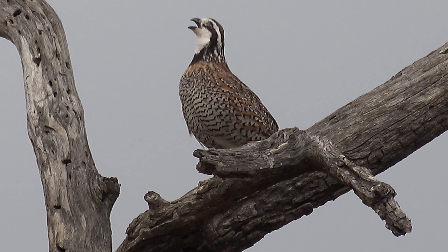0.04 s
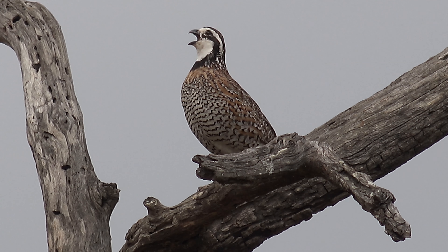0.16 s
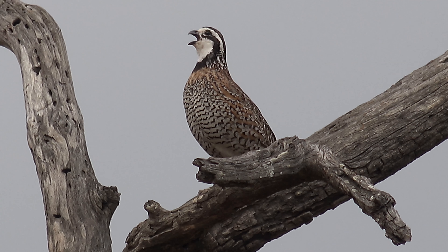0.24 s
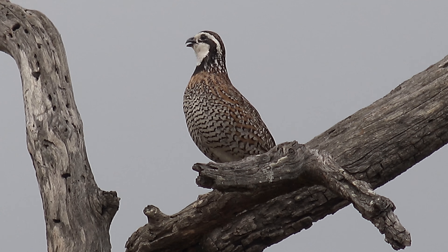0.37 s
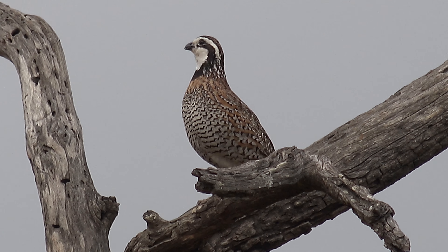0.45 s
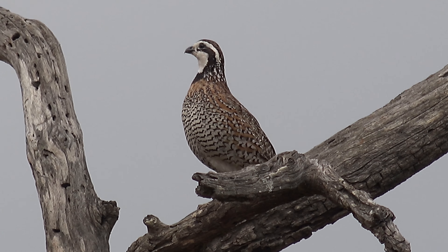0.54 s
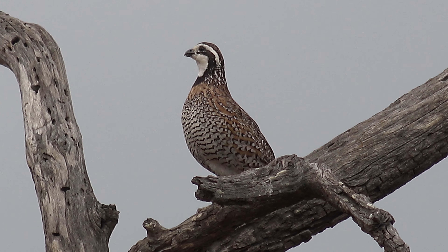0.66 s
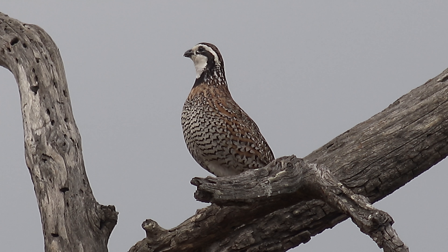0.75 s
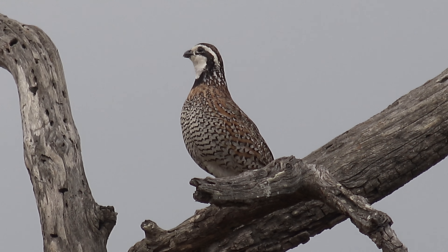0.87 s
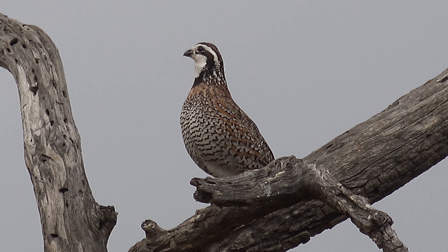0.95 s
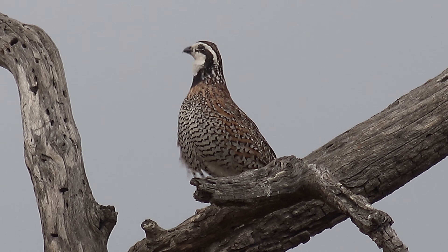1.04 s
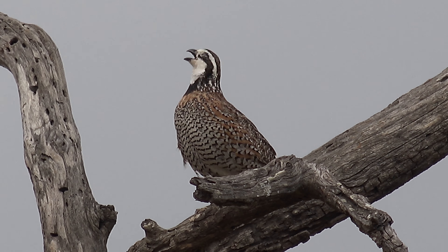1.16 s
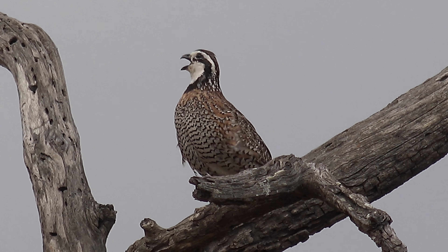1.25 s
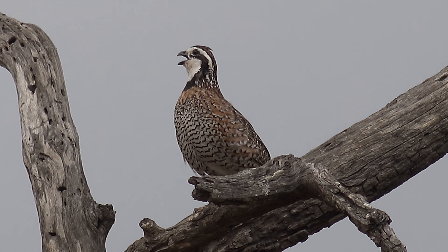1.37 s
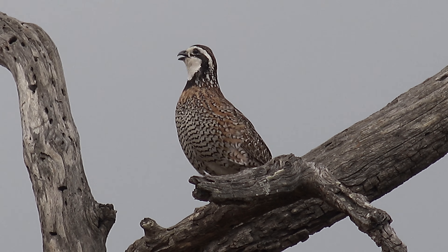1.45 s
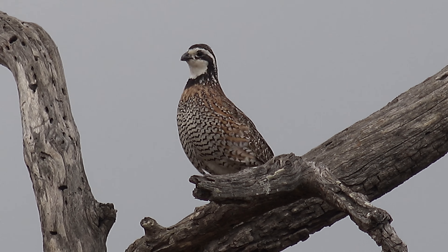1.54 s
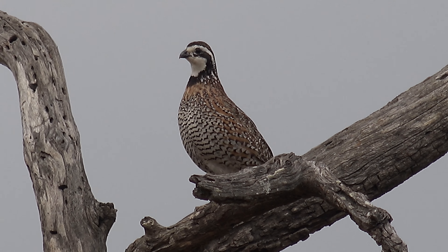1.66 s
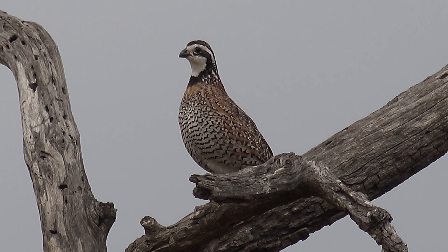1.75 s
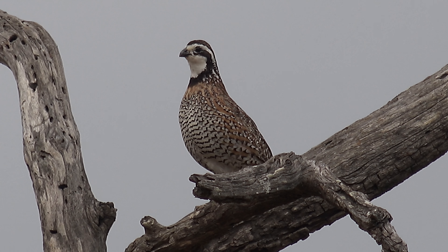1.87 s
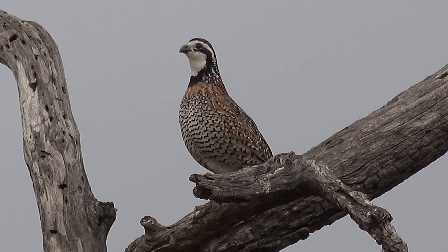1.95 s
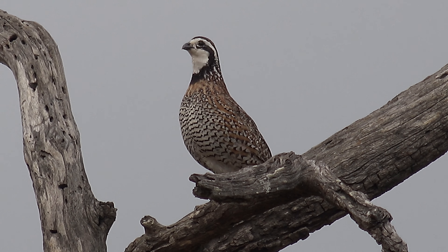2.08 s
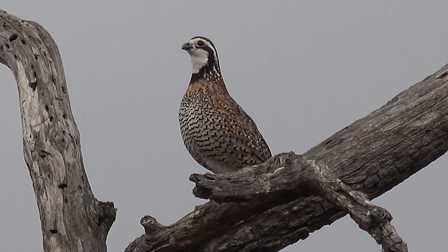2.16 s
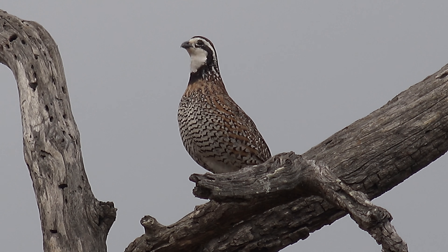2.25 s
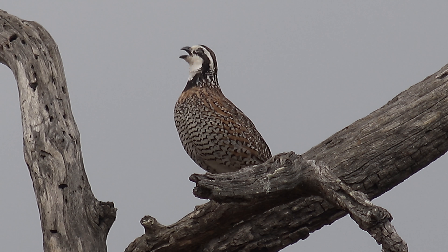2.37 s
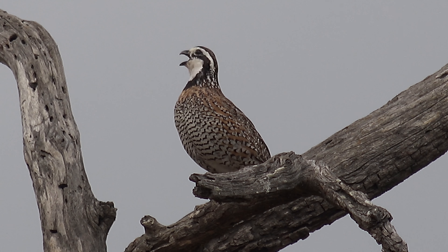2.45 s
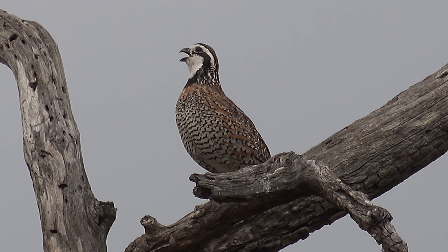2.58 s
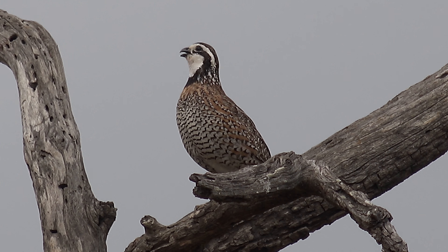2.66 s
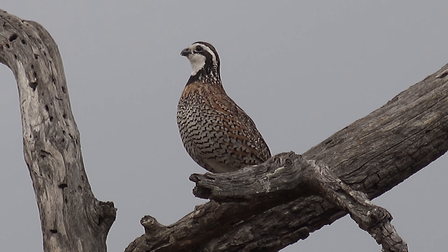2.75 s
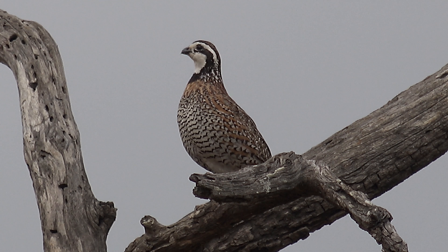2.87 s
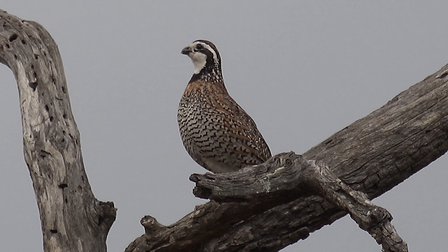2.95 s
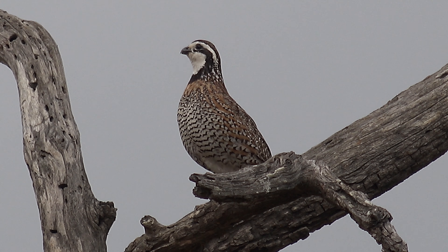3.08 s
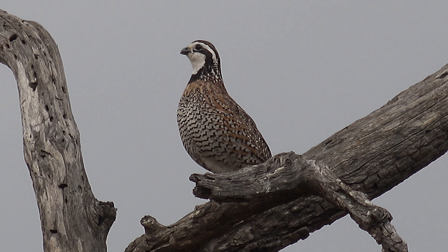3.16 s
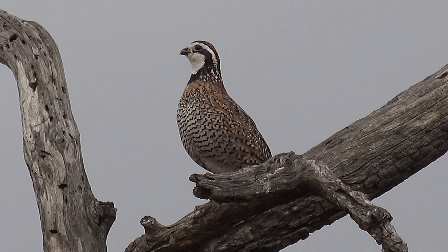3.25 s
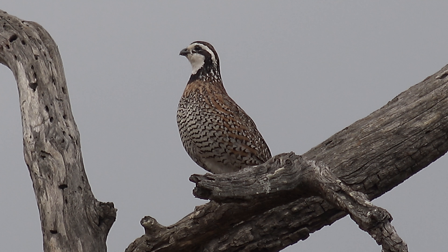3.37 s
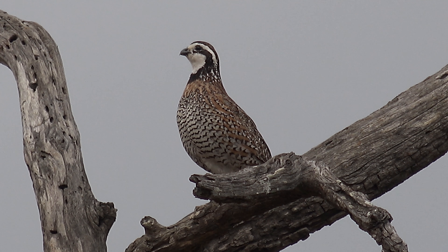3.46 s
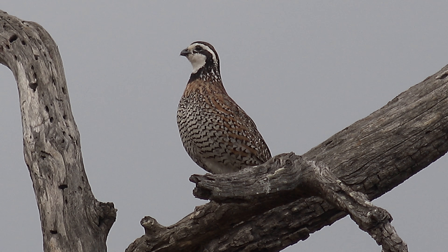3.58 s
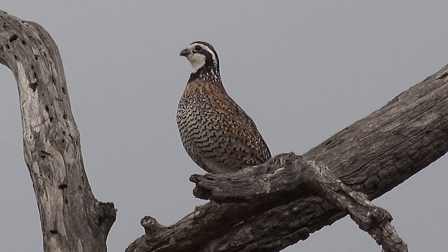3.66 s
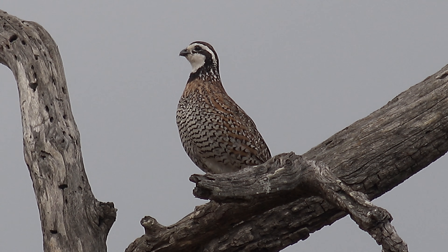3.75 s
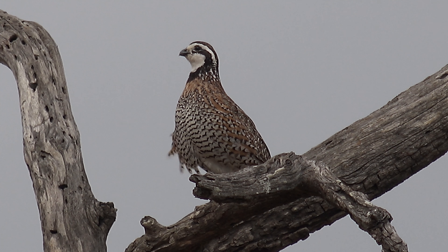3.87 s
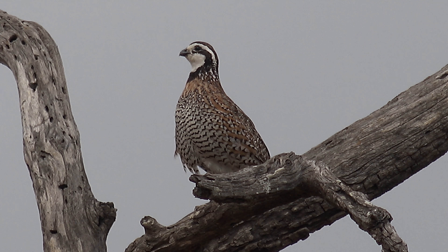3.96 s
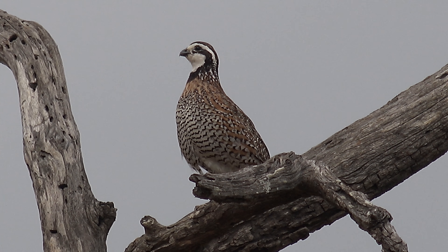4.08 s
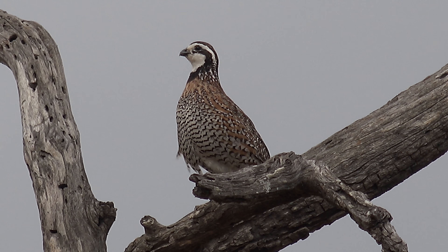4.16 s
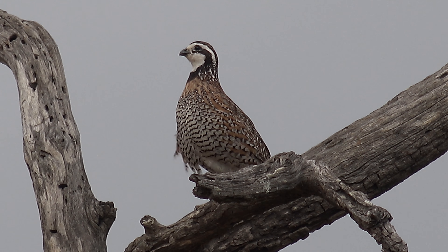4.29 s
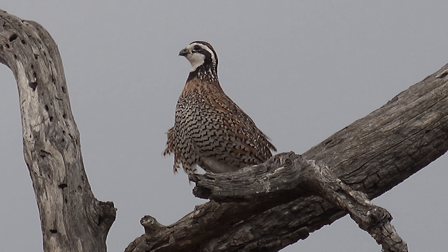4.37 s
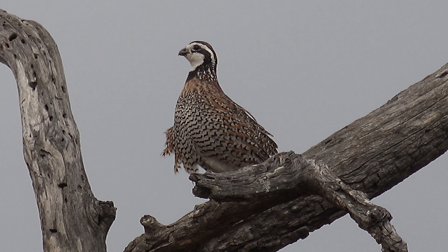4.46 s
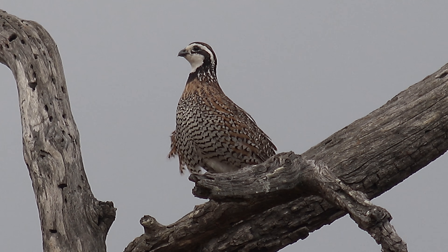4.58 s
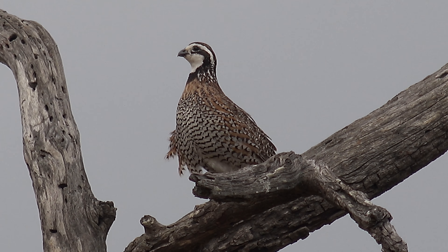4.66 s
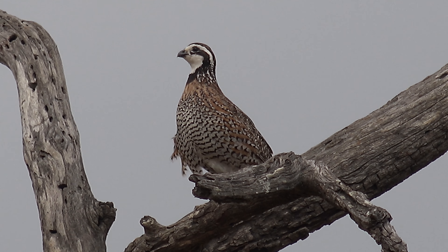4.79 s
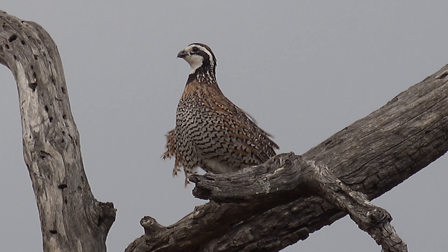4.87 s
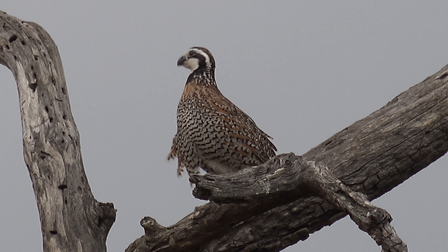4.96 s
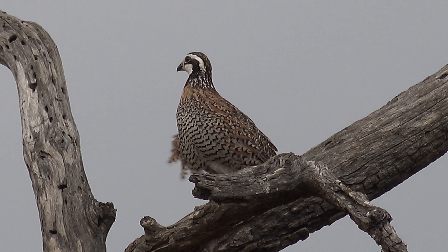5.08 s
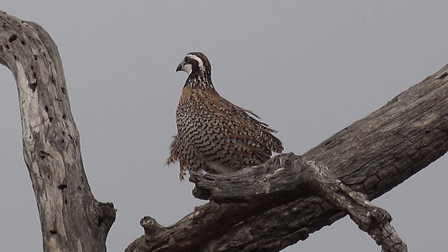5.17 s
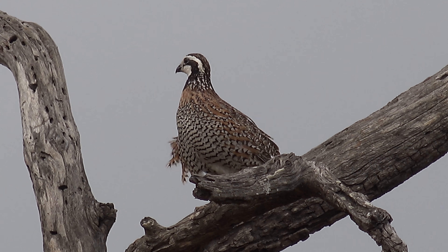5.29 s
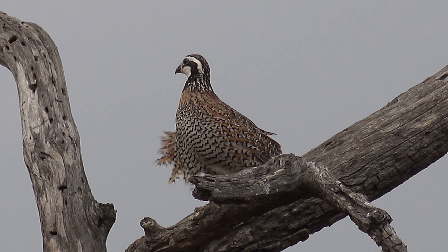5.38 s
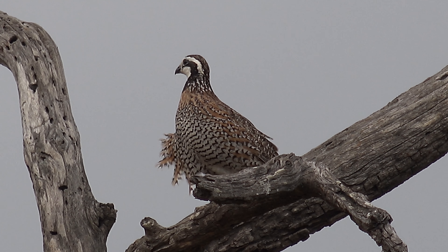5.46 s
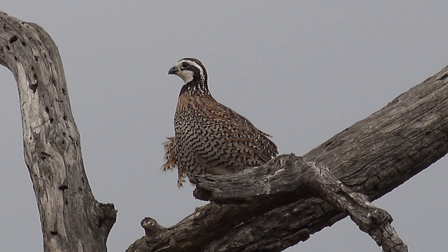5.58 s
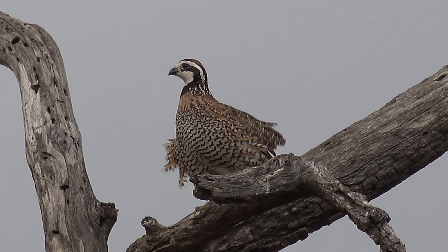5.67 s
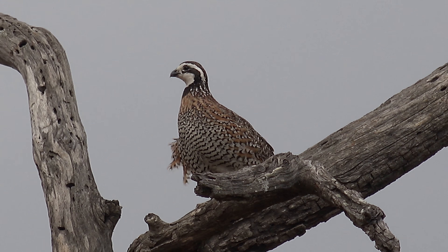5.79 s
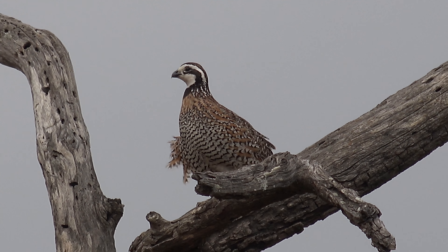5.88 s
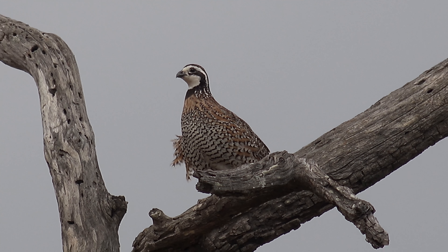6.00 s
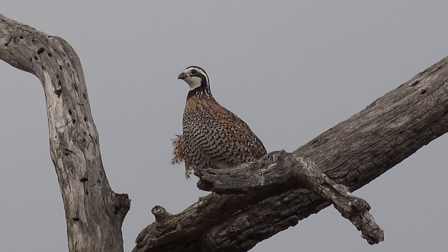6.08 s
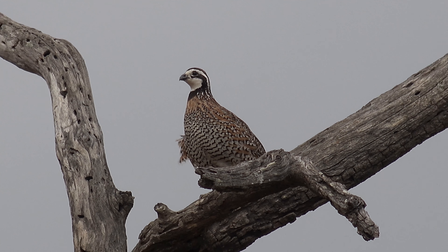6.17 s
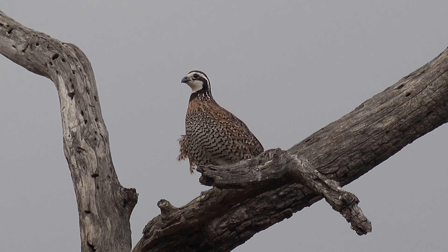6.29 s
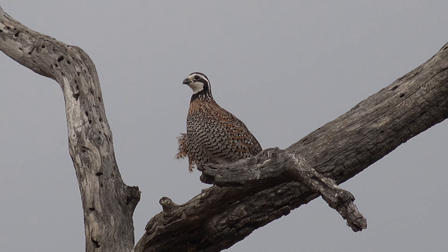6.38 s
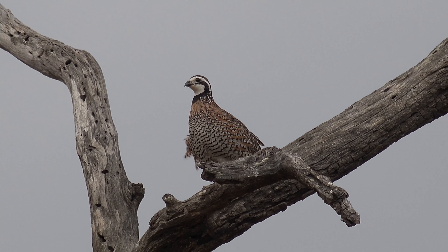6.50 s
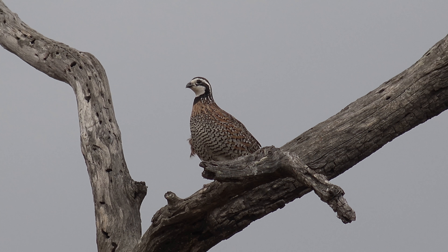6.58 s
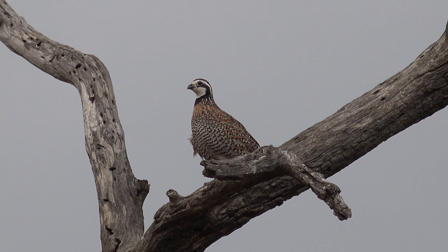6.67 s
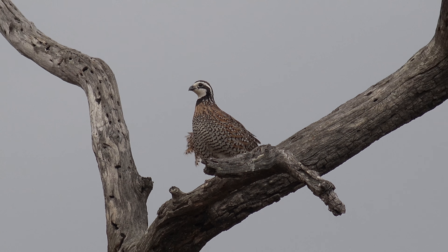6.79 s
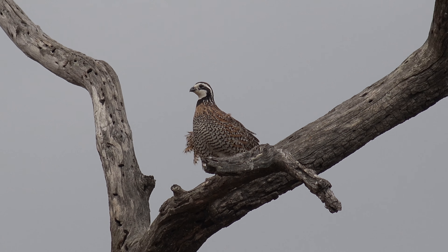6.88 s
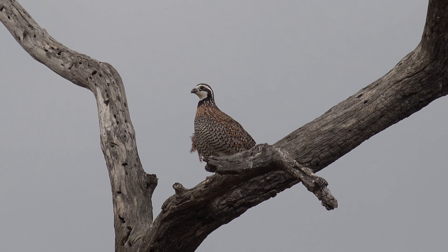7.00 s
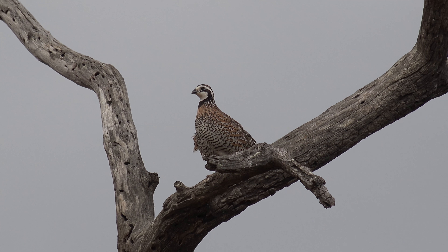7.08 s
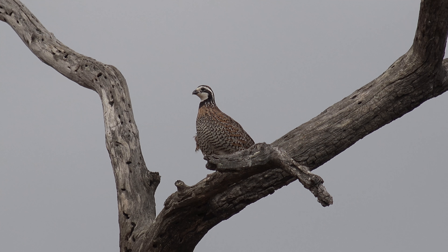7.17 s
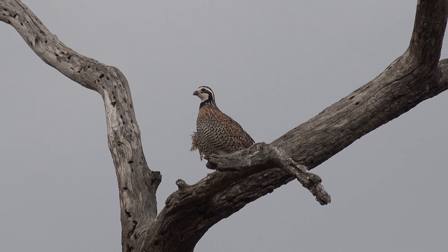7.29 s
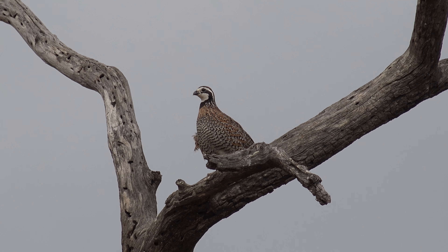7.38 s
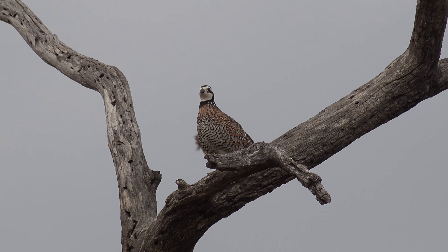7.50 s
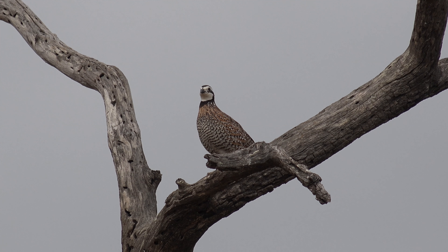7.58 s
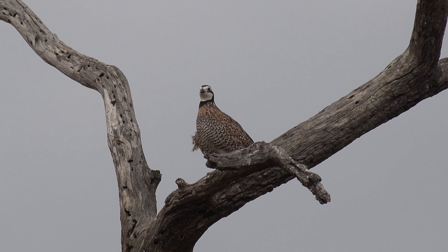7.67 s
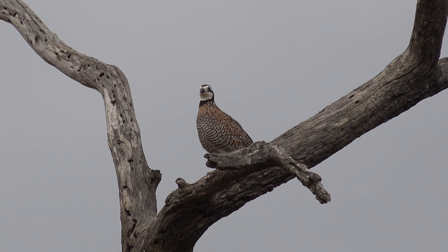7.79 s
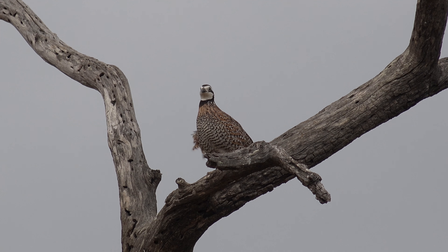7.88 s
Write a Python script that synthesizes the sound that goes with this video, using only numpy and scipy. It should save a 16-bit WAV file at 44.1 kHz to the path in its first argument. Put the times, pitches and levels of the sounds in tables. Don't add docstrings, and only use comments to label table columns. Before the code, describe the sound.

In a quiet open place, a quail close ahead calls almost at once, at about 0.1 seconds: a short quiet lead-in, a strong clear whistle bending upward, then a quick hoarse falling end. Hard camera shutter clicks clatter beside the microphone at 0.2 to 0.3 seconds, overlapping it. The call repeats near 1.2 and 2.4 seconds, with slight scattered echo. Softer, duller shutter bursts come around 0.7, 2.5, 3.0 and 4.2 seconds, with small taps near 2.2 and 4.6. A faint insect rasp swells around 2.6. From about 3 seconds the quail is silent and distant songbirds stand out with thin piping, chips, sliding whistles and burry notes. Another bright shutter cluster snaps at 5.0 to 5.3 seconds, followed by weaker clacks near 5.9 and 7.2 and a tap at 7.7. Soft hiss and faint low gusts continue throughout.

```python
import sys
import numpy as np
from scipy import signal
from scipy.fft import rfft, irfft, next_fast_len
from scipy.io import wavfile

SR = 44100
rng = np.random.default_rng(int(sys.argv[2]) if len(sys.argv) > 2 else 0)


def voltage_ratio(level):
    return 10 ** (np.asarray(level, float) / 20)


def file_out(sig):
    cols = np.atleast_2d(sig).T
    lim = np.clip(cols, -1, 1)
    pcm = np.round(lim * 32767).astype(np.int16)
    wavfile.write(sys.argv[1], SR, pcm)


N = 350154

# time_s, pitch_hz, level_db
WHISTLE = [
    (-.05, 830, -46),
    (-.034, 1285, -56.5),
    (-.013, 1380, -50),
    (-.004, 1756, -32.5),
    (.003, 1888, -28.5),
    (0.072, 1917, -27),
    (0.122, 2029, -24),
    (0.1461, 2160, -19),
    (0.154, 2263, -25.5),
]
BREAK_S, FALL_S = .153, .097


def rms_one(x):
    return x / np.sqrt(np.mean(x ** 2) + 1e-20)


def at_hz(points, hz):
    table_hz, db = np.array(points).T[:2]
    return np.interp(np.log(np.maximum(hz, 1)), np.log(table_hz), db)


def filtered(x, order, edges_hz, kind="low"):
    return signal.sosfilt(signal.butter(order, edges_hz, kind, fs=SR, output="sos"), x)


def coloured(x, points):
    size = 2048
    log_gain = np.log(voltage_ratio(at_hz(points, np.arange(size // 2 + 1) * SR / size)))
    fold = np.r_[1, 2 * np.ones(size // 2 - 1), 1, np.zeros(size // 2 - 1)]
    cepstrum = irfft(log_gain) * fold
    impulse = irfft(np.exp(rfft(cepstrum)))
    return signal.oaconvolve(x, impulse[None], axes=1)[:, :N]


def drift(rate_hz, size):
    r = np.exp(-2 * np.pi * rate_hz / SR)
    slow = signal.lfilter([1], [1, -2 * r, r * r], rng.standard_normal(size + 4000))
    return rms_one(slow[2000:])[2000:]


def panned(x, pan_db):
    return x * voltage_ratio(np.array([[.5], [-.5]]) * pan_db)


def scrub(x, t60_s, wet_db, gap_s):
    t = np.arange(int(t60_s * SR)) / SR
    tail = rng.standard_normal((2, len(t))) * voltage_ratio(-60 * t / t60_s) * np.clip(t / gap_s, 0, 1)
    tail = voltage_ratio(wet_db) * tail / np.sqrt(np.sum(tail ** 2, axis=1, keepdims=True))
    return x + signal.oaconvolve(x, tail, axes=1)[:, :N]


def call_contour(t, whistle_db, fall_db, dip_depth, sharp_hz):
    # time_s, depth_db, width_s
    dips = [
        (.008, -3, 0.0016),
        (0.087, -1.5, 0.0067),
        (.14, -1.5, .003),
    ]
    fall_hz, creep_per_s, sag_from_s, sag_per_s = 1643, 2.2, .03, 5.6
    slip_s, slip_width_s, slip_share, slip_db = .0135, .00086, .205, 3
    second_s, second_width_s, second_share = .037, .0034, .05
    swell_s, swell_db, dying_db_per_s, last_s = .023, 24, 153, .0053
    shut_s, shut_db = .004, 24.5
    s, hz, db = np.transpose(WHISTLE)
    held_hz = np.interp(t, s, hz) + sharp_hz * (t > 0)
    dip_db = sum(depth * np.exp(-((t - at) / width) ** 2) for at, depth, width in dips)
    held_db = np.interp(t, s, db) + whistle_db * (t > -.005) + dip_depth * dip_db

    u = t - BREAK_S
    slip = slip_share * (1 + np.tanh((u - slip_s) / slip_width_s)) / 2
    slip += second_share * (1 + np.tanh((u - second_s) / second_width_s)) / 2
    sagging_hz = fall_hz * np.exp(-creep_per_s * u - slip - sag_per_s * np.maximum(u - sag_from_s, 0))
    dying_db = fall_db - swell_db * np.clip(1 - u / swell_s, 0, 1) ** 2
    dying_db -= dying_db_per_s * np.maximum(u - swell_s, 0)
    dying_db += slip_db * np.exp(-((u - slip_s) / slip_width_s) ** 2)
    dying_db -= 8 * np.clip(1 - (FALL_S - u) / last_s, 0, 1)

    closed = np.clip(1 - abs(u) / shut_s, 0, 1) + np.clip(1 - (t - s[0]) / shut_s / 2, 0, 1)
    return np.where(u > 0, sagging_hz, held_hz), np.where(u > 0, dying_db, held_db) - shut_db * closed


def quail():
    # start_s, whistle_db, fall_peak_db, dip_depth, sharp_hz
    calls = [
        (0.0792, -0.8, -29, 2.4, -7.5),
        (1.170, -1.8, -28, 0.85, 6),
        (2.375, -2.5, -28.5, 1.3, 12.5),
    ]
    membrane = [
        (29.5, 0.0099, -8, -6.5, 26.5),
        (7, 0.0062, -19.5, -3.5, -9),
        (0, 0.0048, 5.5, 0.5, 5.5),
    ]
    # frequency_hz, gain_db
    throat = [(600, -13.5), (1300, -18.5), (1850, -5), (2400, 9), (3200, -1.5), (3550, -25.5), (4300, -16),
              (5000, -21), (5800, -31), (7700, -27.5), (9600, -25), (11000, -86)]
    # delay_s, level_db
    echoes = [
        (.011, -17),
        (.023, -20),
    ]
    half_db, jitter, hoarse_db, breath_db = -24, .006, 3, -21
    out = np.zeros(N)
    t = np.arange(WHISTLE[0][0], BREAK_S + FALL_S, 1 / SR)
    falling = t > BREAK_S
    shut, whistle, slack = np.pad(membrane, ((0, 0), (0, 8)))
    opening = np.clip(1 + t / .012, 0, 1)
    source_db = [np.where(falling, slack[n], shut[n] + opening * (whistle[n] - shut[n])) for n in range(12)]
    for start_s, *effort in calls:
        pitch_hz, level_db = call_contour(t, *effort)
        hz = pitch_hz * (1 + jitter * (falling + 6 * (t < -.005)) * drift(280, len(t)))
        phase = 2 * np.pi * np.cumsum(hz) / SR
        gains = [voltage_ratio(at_hz(throat, n * hz) + db) for n, db in enumerate(source_db, 1)]
        voice = sum(g * np.sin(n * phase) for n, g in enumerate(gains, 1))
        voice = voice / np.sqrt(sum(g ** 2 for g in gains) / 2)
        halves = np.sin(1.5 * phase) * np.exp(-t / .03) + .12 * np.sin(4.5 * phase)
        voice += voltage_ratio(half_db) * halves * (t > 0) * np.exp(-t / .09) * ~falling
        breath = coloured(rng.standard_normal((1, len(t))), throat)[0, :len(t)]
        voice += voltage_ratio(breath_db) * falling * rms_one(breath)
        voice *= voltage_ratio(level_db + hoarse_db * falling * np.tanh(drift(220, len(t))))
        at = round((start_s + t[0]) * SR)
        out[at:at + len(t)] += voice * np.clip((t[-1] - t) / .0043, 0, 1)
    return out + sum(voltage_ratio(db) * np.roll(out, round(delay_s * SR)) for delay_s, db in echoes)


def strikes(low_hz, high_hz):
    # start_s, peak_db
    hard = [(.2052, -19), (.2085, -20), (.2548, -20), (.268, -21), (.2935, -23), (5.0454, -22),
            (5.2475, -25), (5.2506, -22), (5.2531, -21), (5.2885, -23), (5.29, -24)]
    s, db = np.transpose(hard)
    hits = np.full(N, 1e-18)
    hits[(s * SR).astype(int)] = 2.8 * voltage_ratio(db)
    return filtered(hits, 2, [low_hz, high_hz], "band")


def rattle(contacts, body, modes_db, alike):
    # frequency_hz, width_hz, level_db
    modes = [(391.3, 30.5, 3), (907, 49, -7), (1310, 34.6, -10.5), (2160, 16, -1), (2530, 21, 0.5),
             (3700, 95, -1.5), (4170, 230, -8.5), (5020, 39.8, -38.5), (7080, 48, -18.5)]
    shake, cracks = np.zeros((2, 2, N))
    for s, db, t60_s, rise_s, pan_db, crack_db in contacts:
        at = round(s * SR)
        t = np.arange(max(min(int(t60_s * SR), N - at), 0)) / SR
        cracks[:, at:at + len(t)] += panned(voltage_ratio(db + crack_db - 60 * t / .02), pan_db)
        dying = voltage_ratio(-60 * t / t60_s) + voltage_ratio(crack_db - 60 * t / .0013)
        shake[:, at:at + len(t)] += panned(voltage_ratio(db) * dying * np.clip(t / rise_s, 0, 1), pan_db)
    mid, side = rng.standard_normal((2, N)) * voltage_ratio(2.5 * drift(404, N))
    clicks = np.sqrt(alike) * mid + np.sqrt(1 - alike) * side * [[1], [-1]]
    scale = np.sqrt(np.mean(coloured(clicks[:, :SR], body) ** 2))
    broad = coloured(clicks * shake, body) * 3 / scale
    rings = 0
    for hz, width_hz, db in modes:
        r = np.exp(-np.pi * width_hz / SR)
        poles = [1, -2 * r * np.cos(2 * np.pi * hz / SR), r * r]
        rings += voltage_ratio(db) * signal.lfilter([1 - r, 0, r - 1], poles, clicks * shake + 1e-18)
    snap = filtered(clicks * cracks, 2, [3000, 9000], "band")
    return broad + voltage_ratio(modes_db) * rings + 1.1 * snap


def ports(x):
    # frequency_hz, left_lead_rad
    port_lead = [(0, 0), (780, 1.1), (3450, 0.3), (5770, 0.5), (7750, 2.3), (10600, 3.6), (11800, 5.7),
                 (16000, 6.4)]
    # frequency_hz, left_minus_right_db
    port_balance = [(60, -3), (330, -0.5), (770, 5.5), (1790, 5.5), (4190, 3), (6410, 2.5), (9810, 3.5),
                    (16000, -8)]
    size = next_fast_len(N)
    hz = np.arange(size // 2 + 1) * SR / size
    turn = np.exp(.5j * np.interp(hz, *np.transpose(port_lead)))
    half = voltage_ratio(at_hz(port_balance, hz) / 2) * turn
    return irfft(rfft(x, size) * np.array([half, 1 / half]), size)[:, :N]


def cameras():
    # start_s, peak_db
    releases = [(0.7058, -37.5), (2.5249, -37.5), (2.9632, -42), (4.1887, -37), (5.204, -41), (5.45, -42),
                (5.93, -36.5), (7.1736, -42), (7.8773, -48.5)]
    # after_release_s, level_db, t60_s, rise_s
    firing = [
        (0, 1.5, 0.092, 0.0015),
        (0.016, -2.5, 0.19, 0.0017),
        (0.094, 4, 0.11, 0.0036),
        (0.107, -6.5, .12, .002),
        (.123, -7, 0.098, .001),
        (.143, -2, 0.068, 0.00064),
        (.151, -1.5, .07, 0.0022),
        (0.178, -7, 0.12, 0.0013),
    ]
    # start_s, peak_db, t60_s, left_minus_right_db, crack_db
    near_contacts = [(0.1992, -18, 0.1, 1, -2), (0.2048, -23.5, 0.1, -2.5, -15),
                     (0.2137, -30, 0.0965, 7.5, 4.5), (0.2512, -19.5, 0.17, -2, 6),
                     (0.2683, -20.5, 0.065, 4, 17), (0.2909, -23.5, 0.07, 1.5, -9),
                     (5.0456, -31.5, 0.1, -2, 26.5), (5.2405, -29, 0.099, 3, -10),
                     (5.246, -19.5, 0.15, -1.5, 0), (5.2586, -25.5, 0.044, 4.5, -4),
                     (5.284, -23, 0.067, -2, -11), (5.2879, -25.5, 0.054, 2, -10),
                     (5.298, -36, 0.041, -4, -5), (5.319, -38, 0.12, 2, -14)]
    # frequency_hz, level_db_per_hz
    far_body = [(180, -49), (300, -18.5), (398, 3), (494, -5.5), (856, -3), (1100, -7.5), (1560, -0.5),
                (3400, -3.5), (4300, -5), (16000, -26)]
    # frequency_hz, level_db_per_hz
    near_body = [(120, -50.5), (200, -31), (347, -9.5), (1100, -8), (1420, -0.5), (1740, -3.5),
                 (2170, -1.5), (2470, -5.5), (4040, 0), (5230, -3.5), (16000, -28)]
    dull, bright = [[(s + lag_s, db + part_db - 19.5, t60_s, rise_s, .1, -9)
                     for s, db in releases for lag_s, part_db, t60_s, rise_s in part]
                    for part in (firing[:2], firing[2:])]
    near = [(s, db - 18, t60_s, .0025, pan_db, crack_db) for s, db, t60_s, pan_db, crack_db in near_contacts]
    mirror = filtered(rattle(dull, far_body, 21, .95), 2, 7000)
    blades = rattle(bright, far_body, 19.9, .84)
    return ports(mirror + blades + rattle(near, near_body, 13, .77) + strikes(3200, 8100))


def taps():
    # start_s, peak_db, knock_hz, left_minus_right_db, tick_db
    tap_rows = [(1.241, -56, 401, 0.5, -28.5), (5.046, -52, 368.3, -1, -30), (2.018, -46, 1380, -3, -32),
                (2.182, -47, 1560, 9.5, 2), (2.19, -58, 3280, 6, 6), (2.215, -44, 1520, 6, -4),
                (2.222, -64, 2980, -2, -8), (4.601, -42, 1350, -3, 11), (5.14, -52, 1880, 0, -24),
                (7.409, -50.5, 860, 5, -21), (7.728, -38, 1410, -3.5, -24)]
    t60_left_s, t60_right_s, tick_t60_s = .14, .055, .0087
    out = np.zeros((2, N))
    t = np.arange(2000) / SR
    for s, db, hz, pan_db, tick_db in tap_rows:
        grit = rng.standard_normal(2000)
        t60_s = t60_left_s if pan_db > 0 else t60_right_s
        tick = rms_one(filtered(grit, 4, [1900, 5800], "band")) * voltage_ratio(tick_db - 60 * t / tick_t60_s)
        knock = rms_one(filtered(grit, 1, [.6 * hz, 1.4 * hz], "band")) * voltage_ratio(-60 * t / t60_s)
        out[:, round(s * SR):][:, :2000] += panned(voltage_ratio(db - 7) * (knock + tick), pan_db)
    return out


def notes(table, edge_s, flutter_db, burr, burr_hz, spread_db):
    out = np.zeros((2, N))
    for (s, length_s, *hz, db), side in zip(table, rng.standard_normal(len(table))):
        t = np.arange(int(length_s * SR)) / SR
        glide_hz = np.exp(np.polyval(np.polyfit([0, length_s / 2, length_s], np.log(hz), 2), t))
        glide_hz *= 1 + .018 * burr * (length_s < .11) * drift(150, len(t))
        beat_hz = burr_hz * (1 + .32 * drift(28.4, len(t)))
        beat = 1 + burr * np.cos(2 * np.pi * np.cumsum(beat_hz) / SR)
        shape = np.clip(np.minimum(t, (length_s - t) / 3) / min(edge_s, length_s / 6), 0, 1)
        level = voltage_ratio(db + 9 + flutter_db * drift(110, len(t)))
        tone = np.sin(2 * np.pi * np.cumsum(glide_hz) / SR) * beat * shape * level
        at = round(s * SR)
        out[:, at:at + len(t)] += panned(tone, 1.5 + spread_db * side)
    return out


def sung(*kinds):
    return [(s, length_s, hz * first, hz, hz * last, db)
            for first, last, rows in kinds for s, length_s, hz, db in rows]


def songbirds():
    # start_s, length_s, middle_hz, level_db
    swoops = [(.36, 0.044, 4500, -80), (.568, .016, 3350, -83), (1.075, 0.033, 4370, -76.5),
              (1.64, 0.061, 4860, -77), (1.862, 0.081, 4900, -75.5), (2.085, 0.035, 4360, -77),
              (2.263, 0.054, 4410, -70.5), (3.63, .03, 4700, -78), (3.825, .03, 4670, -80),
              (6.771, 0.034, 4240, -68)]
    hooks = [(4.472, 0.019, 3700, -53), (4.76, 0.018, 3790, -58.5)]
    slides = [(1.78, 0.12, 3130, -85), (1.9, 0.046, 2273, -71.5), (2.049, 0.075, 2330, -72.5),
              (2.9, 0.093, 2260, -71), (3.378, 0.14, 3160, -67), (7.015, 0.15, 3220, -69)]
    flicks = [(3.563, 0.045, 3470, -61.5), (3.882, 0.036, 3470, -64.5), (4.17, 0.019, 3450, -55.5),
              (5.618, 0.039, 3670, -56), (7.048, 0.025, 4220, -66), (7.125, 0.019, 3920, -65.5)]
    rises = [(6.098, 0.18, 1820, -79), (6.279, 0.005, 4600, -58), (6.52, 0.17, 1850, -81),
             (6.693, 0.0069, 4650, -71), (7.783, 0.011, 4600, -70)]
    lifts = [(2.849, 0.094, 2430, -77), (3.18, 0.063, 3430, -68), (4.269, 0.01, 4400, -61),
             (5.43, .033, 7740, -81), (5.885, .035, 7840, -79), (6.27, 0.054, 7850, -81),
             (6.28, 0.036, 7260, -79), (6.745, 0.012, 4500, -75.5)]
    arches = [(1.775, 0.16, 2554, -77), (6.262, 0.02, 3540, -60), (6.679, .012, 3510, -65),
              (6.995, 0.04, 3660, -69.5)]
    levels = [(.555, 0.014, 3720, -76.5), (.75, 0.06, 5080, -80), (1.03, 0.11, 5020, -74.5),
              (3.596, 0.02, 3750, -62), (3.711, 0.12, 3170, -71.5), (3.906, .02, 3740, -60.5),
              (3.94, 0.14, 3246, -68), (4.66, .04, 2650, -82), (4.752, 0.028, 2530, -61.5),
              (4.776, 0.061, 2650, -60), (4.781, 0.051, 1830, -77), (5.79, 0.058, 2030, -77.5)]
    chips = [(1.695, 0.022, 5870, -62), (1.954, 0.042, 5700, -72), (2.171, 0.018, 5540, -60.5),
             (2.424, 0.025, 5760, -59), (5.466, 0.021, 5910, -63.5), (5.745, 0.024, 5800, -63.5)]
    dives = [(1.59, 0.11, 4660, -73), (3.174, 0.14, 4750, -63.5), (6.838, 0.12, 4620, -63.5)]
    # start_s, length_s, middle_hz, level_db
    churrs = [(1.63, 0.074, 2384, -77.5), (3.328, 0.077, 3050, -75), (5.32, 0.033, 3130, -58.5),
              (5.975, 0.028, 2490, -65), (6.159, 0.046, 2520, -62), (6.359, 0.048, 2550, -63.5),
              (6.582, 0.042, 2550, -64), (6.82, 0.043, 2538, -63.5)]
    tumbles = [(4.547, 0.046, 2860, -62)]
    drops = [(5.118, 0.051, 2116, -68.5), (7.019, 0.033, 2090, -74)]
    sags = [(.485, 0.076, 4640, -82), (3.464, 0.065, 4020, -71), (3.779, 0.023, 4260, -69),
            (3.865, 0.019, 4120, -64), (4.825, 0.05, 2437, -64), (4.875, 0.11, 2320, -69),
            (5.014, 0.034, 3510, -73), (5.533, 0.079, 2580, -63.5), (5.605, 0.13, 2320, -68.5)]
    squeaks = [(4.425, 0.038, 2350, -71.5), (4.44, .05, 3100, -65.5), (4.446, 0.024, 3300, -66),
               (4.717, .04, 2500, -76)]
    drones = [(4.65, 0.098, 3580, -75), (4.775, 0.08, 3520, -73), (4.9, 0.025, 3320, -76),
              (5.665, 0.099, 3640, -65.5), (5.755, 0.049, 3638, -59), (5.81, 0.085, 3720, -69),
              (6.285, 0.26, 3626, -67.5), (7.37, 0.16, 3590, -66.5), (7.5, 0.22, 3635, -61.5),
              (7.72, 0.095, 3590, -73.5), (7.4, 0.21, 7230, -90.5)]
    # start_s, length_s, level_db
    piping = [(1.441, 0.038, -66.5), (1.5, 0.065, -69), (3.235, 0.043, -63), (3.295, 0.06, -68),
              (3.355, 0.015, -70), (4.149, 0.061, -61.5), (4.208, 0.057, -64.5), (5.144, 0.054, -65),
              (5.204, 0.12, -66), (6.494, 0.04, -64), (6.562, 0.042, -61.5)]
    piping_hz, reply_s, reply_db = 3970, .115, -13.5
    piped = [(s, length_s, piping_hz, db) for s, length_s, db in piping]
    pickups = [(s - .006, .01, hz * .95, db - 10) for s, _, hz, db in chips]
    replies = [(s + reply_s, length_s / 2, hz, db + reply_db) for s, length_s, hz, db in churrs]
    song = sung((1.22, .7, swoops), (.96, 1.3, hooks), (1.14, .81, slides), (.79, 1.12, flicks),
                (.88, 1.3, rises), (.92, 1.05, lifts), (.86, .96, arches), (.99, .96, levels + piped))
    chipping = sung((.96, 1.003, chips), (1.55, .87, pickups))
    diving = sung((1.55, .87, dives))
    burry = sung((1.04, .826, churrs), (1.03, .92, replies), (1.18, .824, tumbles), (1.1, .78, drops),
                 (1.03, .92, sags), (.79, 1.12, squeaks))
    droning = sung((.98, 1.005, drones))
    clear = notes(song, .0064, 3.76, 0, 0, 3.2) + notes(chipping, .0023, 3.1, .4, 200, 2.3)
    clear += filtered(notes(diving, .0067, 2.8, 0, 0, 1.5), 2, 4600)
    rough = notes(burry, .0021, 4.65, .52, 122, 1) + notes(droning, .04, 3.84, .51, 94.9, .74)
    return scrub(clear, .44, -8.5, .023) + scrub(rough, .33, .53, .0023)


def chorus(per_s, low_hz, high_hz):
    # time_s, level_db
    chorus_level = [(0, -78), (.44, -94), (1.1, -65), (1.32, -54.5), (1.59, -85), (2.3, -64.5), (2.72, -52),
                    (2.9, -66.5), (3.76, -58.5), (3.91, -52.5), (4.33, -60), (4.87, -59), (5.08, -86),
                    (5.24, -51.5), (5.95, -93), (6.9, -82.5), (7.19, -64), (7.94, -76)]
    at, pitch, fall, size = rng.random((int(per_s * N / SR), 4)).T
    hz = low_hz * (high_hz / low_hz) ** pitch
    start_s, length_s, level_db = at * (N / SR - .1), .015 + .03 * size, 7 * size - 3 * pitch
    table = np.c_[start_s, length_s, hz * (1.1 + .4 * fall), hz, hz * (.95 - .15 * fall), level_db]
    chirps = rms_one(scrub(notes(table, .01, 2.5, 0, 0, 3), .5, 9, .01))
    return voltage_ratio(np.interp(np.arange(N) / SR, *np.transpose(chorus_level)) - 6) * chirps


def insect(hz, width_hz):
    # time_s, level_db
    song_level = [
        (.7, -103),
        (1.17, -75.5),
        (1.59, -78.5),
        (2.56, -65.5),
        (2.72, -70),
        (3.0, -76),
        (3.76, -70),
        (4.33, -93),
    ]
    rasp = rng.standard_normal((2, N)) * voltage_ratio(3 * drift(60, N))
    buzz = rms_one(filtered(rasp, 2, [hz - width_hz, hz + width_hz], "band"))
    return voltage_ratio(np.interp(np.arange(N) / SR, *np.transpose(song_level)) + 3) * buzz


def air():
    # frequency_hz, level_db_per_hz
    hush_spectrum = [(15, -48), (25, -13.5), (175, -0.5), (545, 0), (641, -0.5), (1560, -4.5), (2480, -6),
                     (2840, -7.5), (3820, -7.5), (6560, -14), (10100, -17.5), (14800, -21.5),
                     (16000, -19.5)]
    # frequency_hz, left_right_likeness
    likeness = [(40, 0.93), (125, 0.72), (500, 0.034), (2000, 0.068), (8000, 0.53), (12000, 0.038),
                (16000, 1)]
    level_db = -65
    mid, side = [coloured(rng.standard_normal((1, N + SR))[:, -N:],
                          [(hz, 10 * np.log10(1.001 + sign * c)) for hz, c in likeness])
                 for sign in (1, -1)]
    hush = coloured(mid + side * [[1], [-1]], hush_spectrum)
    return voltage_ratio(level_db) * panned(rms_one(filtered(hush, 1, 140, "high")), .49)


def wind():
    # peak_time_s, peak_db
    gusts = [(0.291, -70), (.8, -77), (1.26, -75), (1.88, -80), (2.17, -81), (2.649, -76.5), (3.07, -71),
             (4.25, -76), (5.281, -69), (6.06, -78), (7.35, -83), (7.94, -78)]
    gust_fall_db_per_s, breeze_db = 112.5, -91
    low = filtered(rng.standard_normal(N), 2, [65, 135], "band")
    t = np.arange(N) / SR
    gusting = sum(voltage_ratio(db - gust_fall_db_per_s * abs(t - s)) for s, db in gusts)
    return rms_one(low) * (voltage_ratio(breeze_db) + gusting)


def scene():
    bird = scrub(panned(quail(), 2.4), .28, -7, .0035)
    bird = scrub(bird, 2, -37, .017)
    birds = bird + songbirds() + chorus(90, 1900, 5600) + insect(4025, 250)
    birds = np.array([np.roll(birds[0], -1), birds[1]])
    close = scrub(cameras() + taps(), .2, -37.5, .008)
    return birds + close + air() + wind()


def band_limit(x):
    return signal.sosfilt(signal.butter(12, 16420, fs=SR, output="sos"), x)


def record(dry):
    mix = signal.sosfilt(signal.cheby2(12, 50, 16650, fs=SR, output="sos"), dry)
    return band_limit(mix)


dry = scene()
out = record(dry)
file_out(out)
```